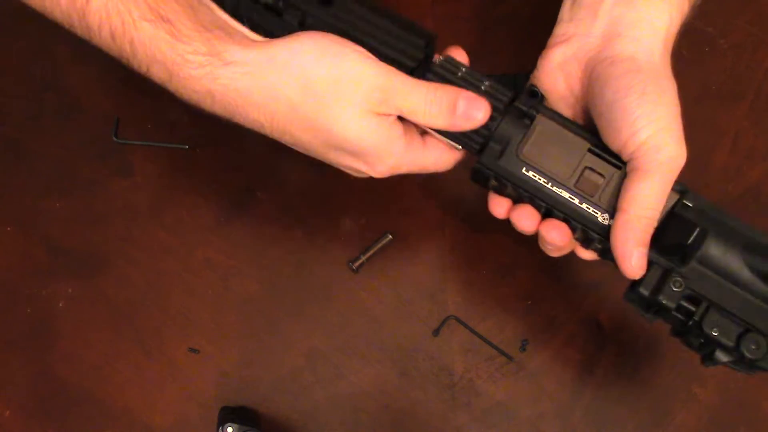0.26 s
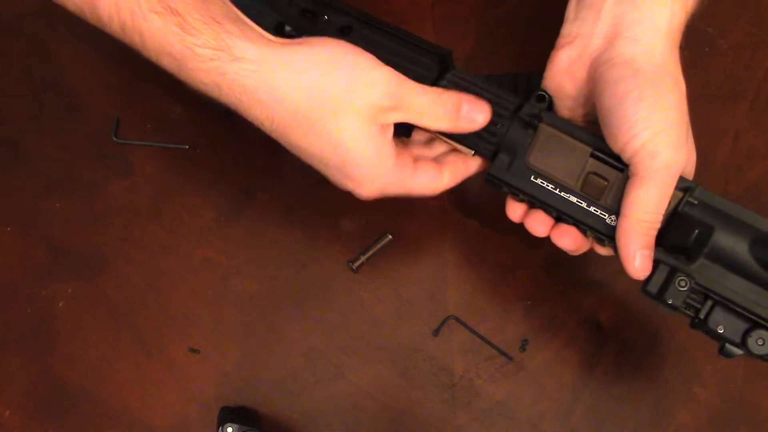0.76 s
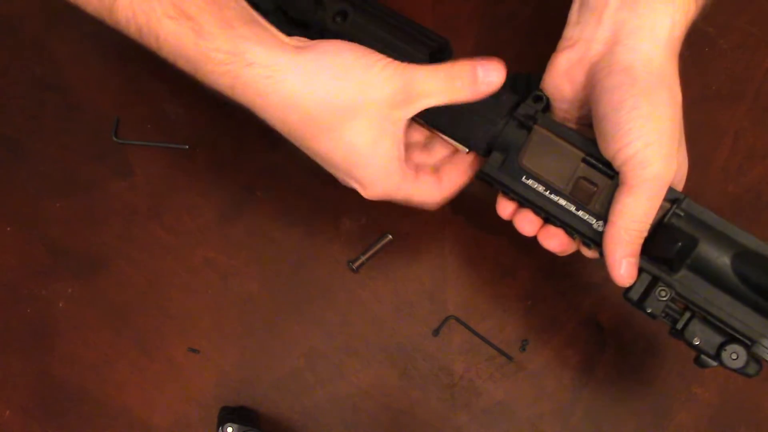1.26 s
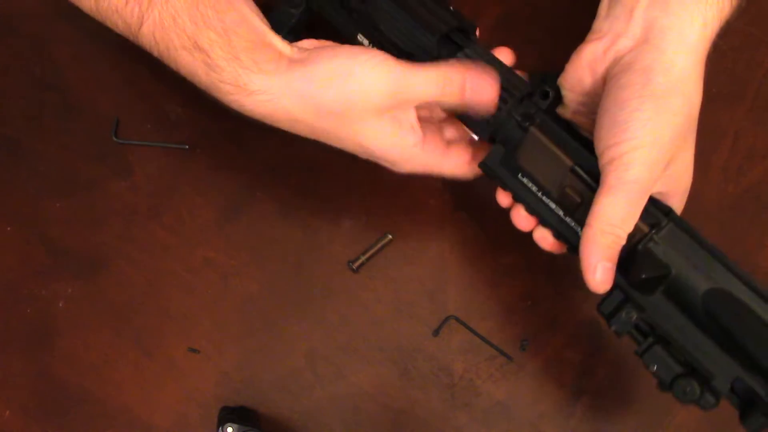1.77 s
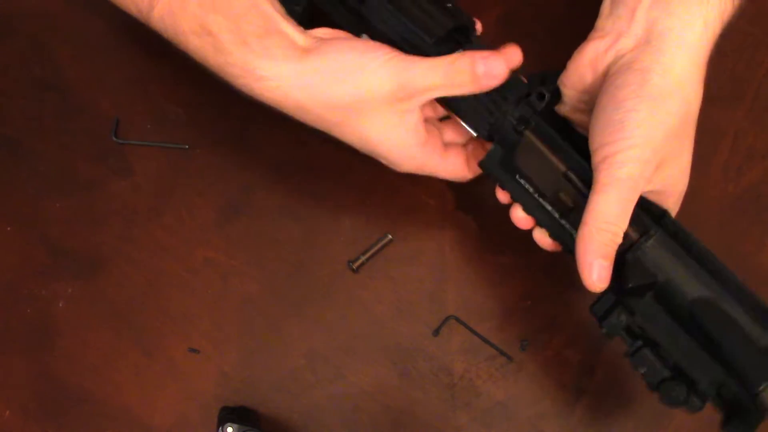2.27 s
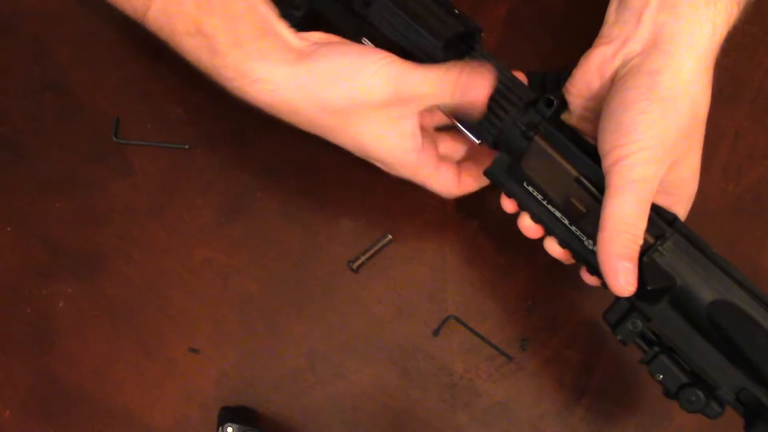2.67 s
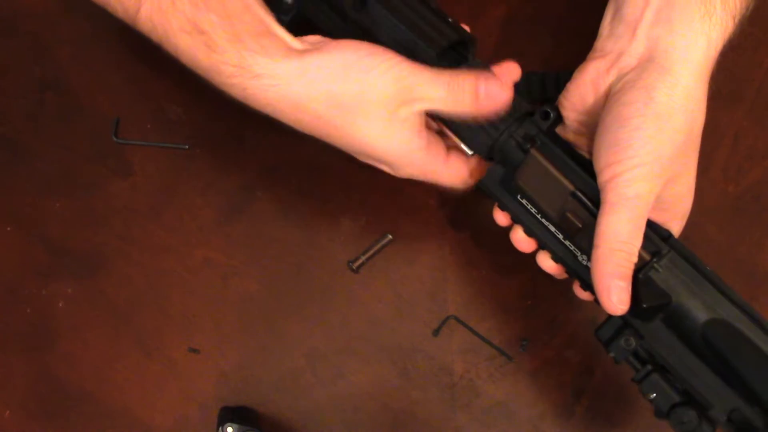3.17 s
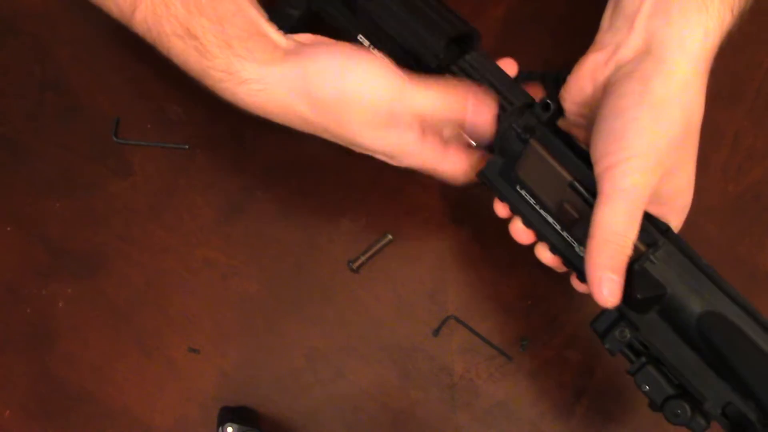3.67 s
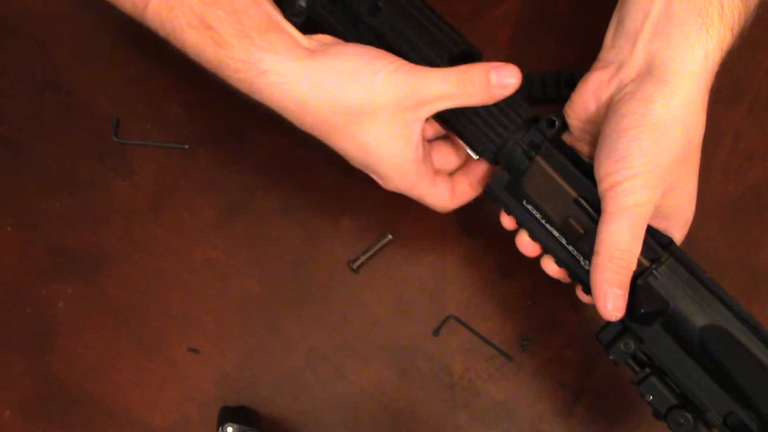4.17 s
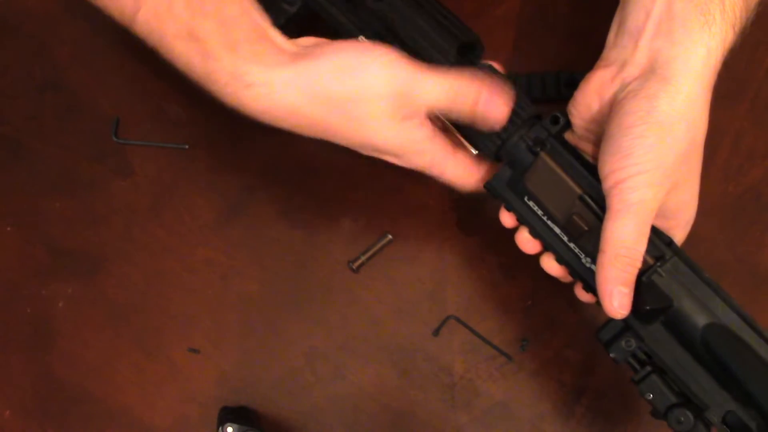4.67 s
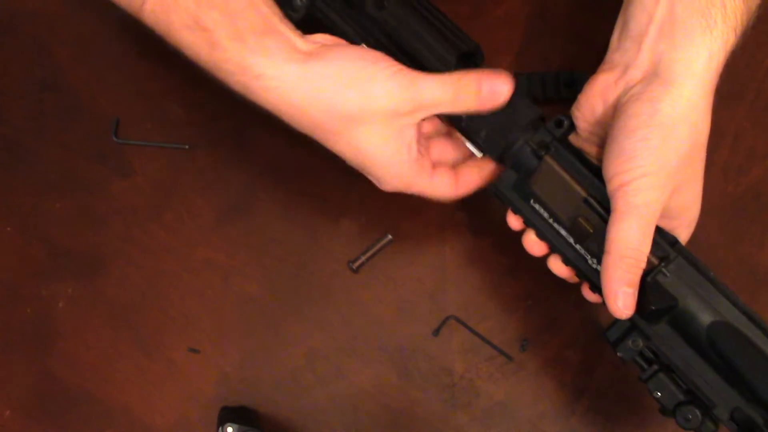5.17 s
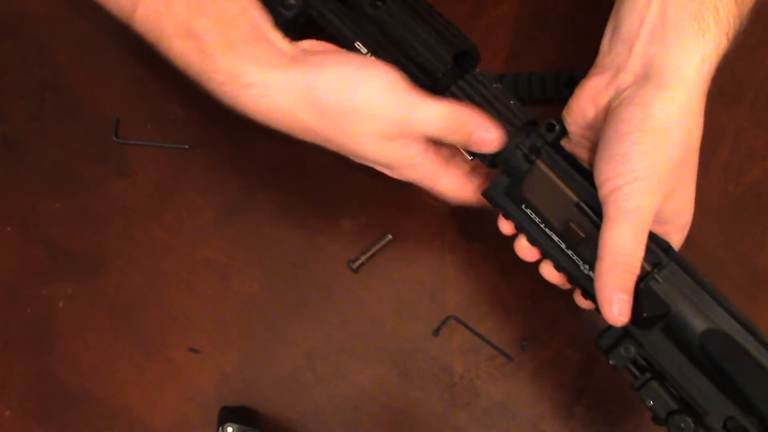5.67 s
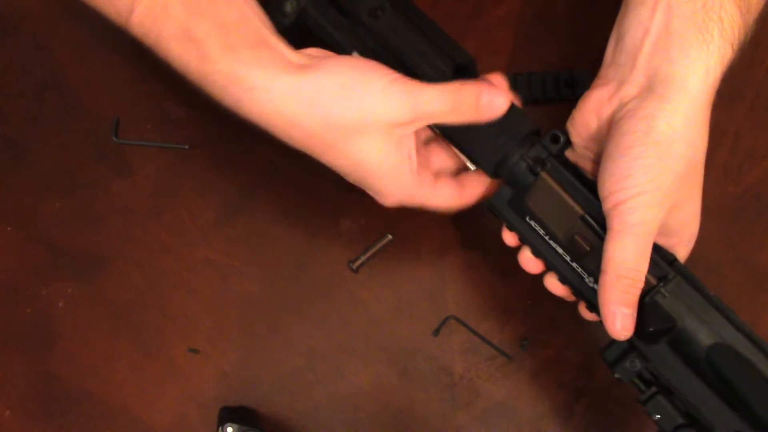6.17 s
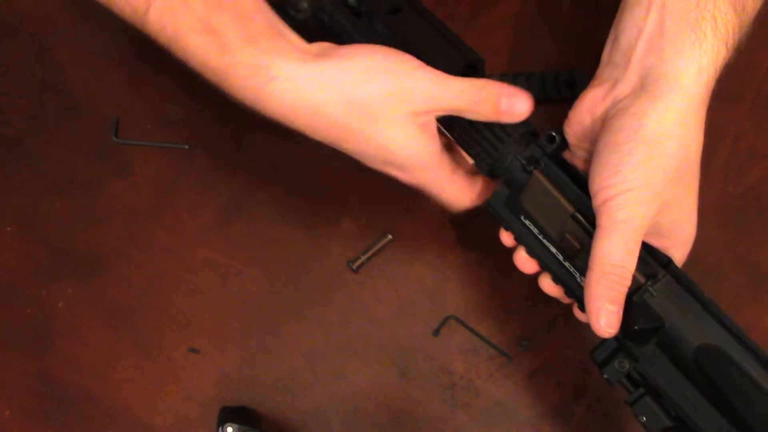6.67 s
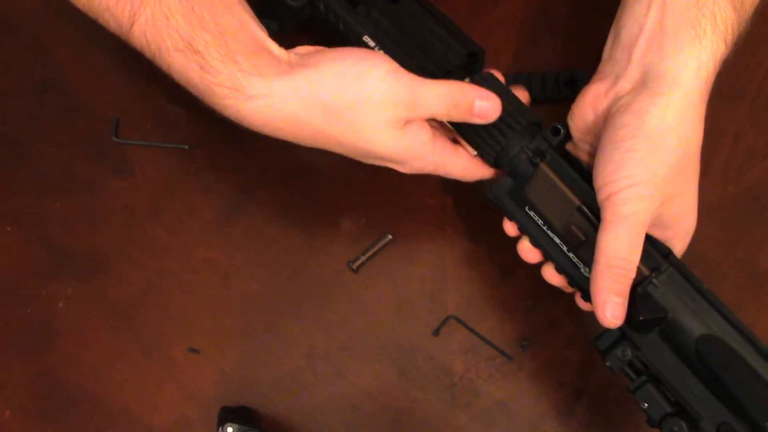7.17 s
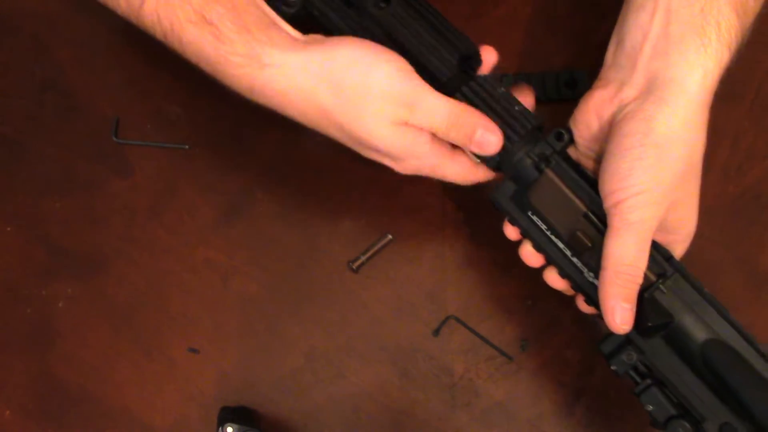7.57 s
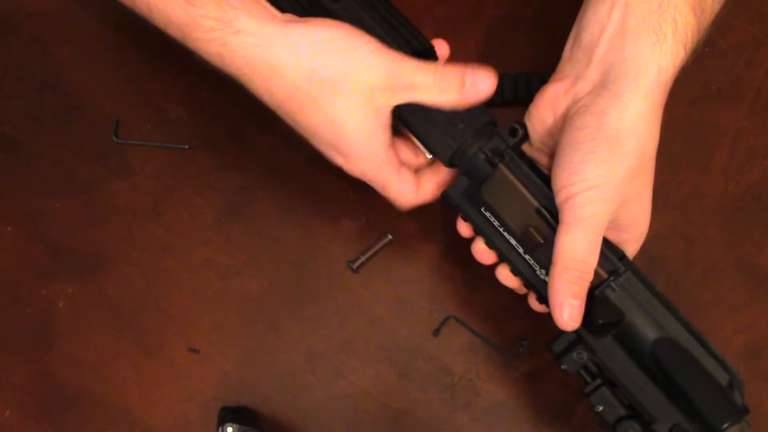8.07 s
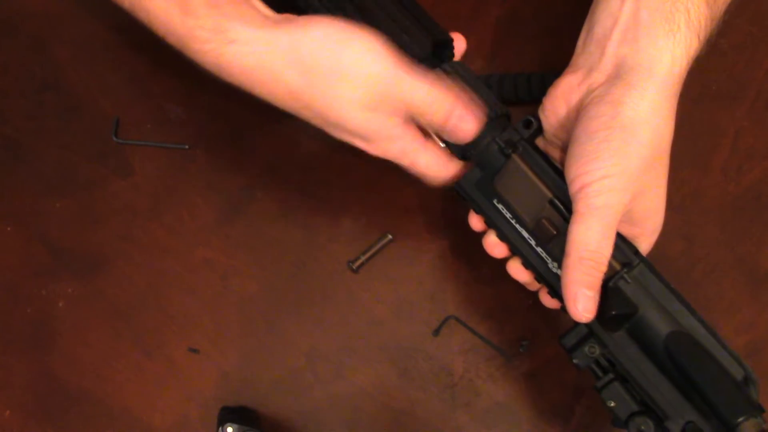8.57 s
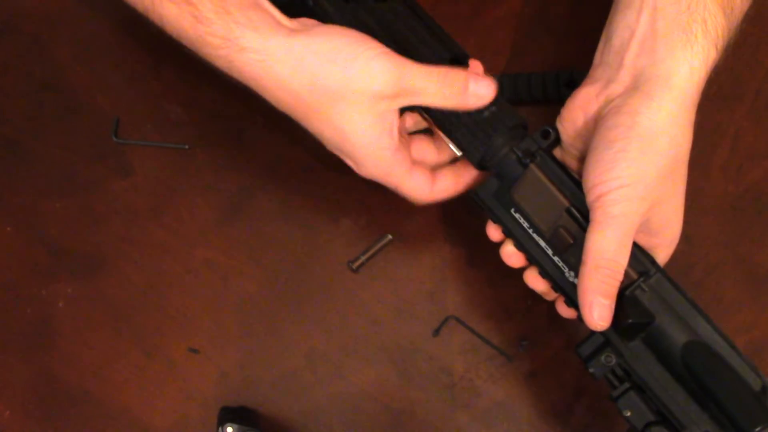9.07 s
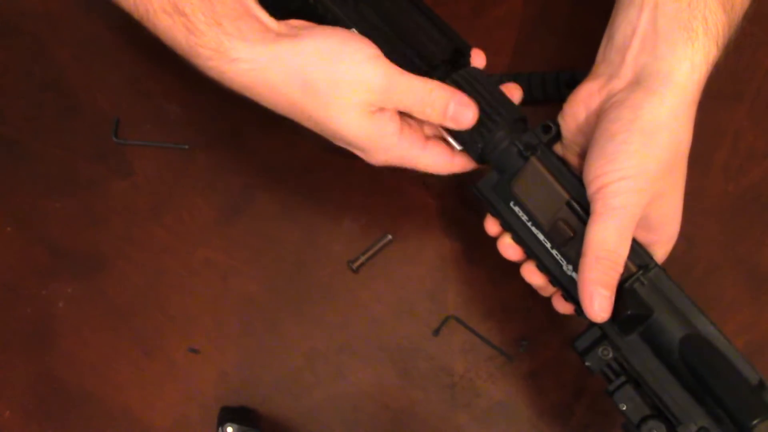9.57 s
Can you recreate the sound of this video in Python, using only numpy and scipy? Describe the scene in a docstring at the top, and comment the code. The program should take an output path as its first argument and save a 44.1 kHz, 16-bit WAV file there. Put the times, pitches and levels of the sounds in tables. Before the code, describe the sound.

Hands twist a metal handguard tube on an airsoft rifle, close up in a small room. Loud, sharp clicks and clacks with brief metallic ringing crowd the first three seconds, then quick ratchet-like runs grow much quieter, with soft gaps between. Near the end the clicks become firmer again. Fingers rub, and a faint mains hum and fan-like drone lie behind.

```python
"""A handguard tube is twisted off an airsoft rifle by hand, close up in a small room.
Each twist is a run of clicks: noise bursts for the snap and catch tick, decaying modes for receiver and tube.
Hard blows ring the tube longer; shaped noise makes the grating thread, rubbing fingers and brushing palm.
Behind them a mains hum of sine harmonics, a fan-like drone of resonant noise and the room's hush sink in the
middle and swell again."""
import sys
import numpy as np
from scipy import signal
from scipy.fft import rfft, irfft, next_fast_len
from scipy.io import wavfile
from scipy.ndimage import uniform_filter1d, minimum_filter1d

SR = 44100
rng = np.random.default_rng(int(sys.argv[2]) if len(sys.argv) > 2 else 0)


def to_wav(sig):
    """Store sig (one row per channel, or 1-D mono) as 16-bit WAV at the path in sys.argv[1].

    Samples outside -1..1 are clipped; the rate is SR.
    """
    pcm = np.clip(np.atleast_2d(sig), -1, 1) * 32767
    pcm = np.round(pcm).astype(np.int16)
    wavfile.write(sys.argv[1], SR, pcm.T)  # frames by channels


N = 432488

# Background: relative level over time: (time [s], level [dB])
BACKGROUND_SWELL = [(0, 13), (1, 11.5), (1.7, 11), (2.75, 5), (3.25, -1), (7.3, 0), (8.25, 6), (9.1, 7.5),
                    (9.81, 14)]
# Mains hum: (harmonic number [-], relative level [dB])
HUM_HARMONICS = [(1, -98), (2, -72), (3, -64.5), (4, -58), (5, -67.5), (6, -70), (7, -89.5), (10, -71.5),
                 (11, -69.5)]
# Fan-like drone: (centre [Hz], relative width [Hz], relative level [dB])
DRONE_RESONANCES = [(137.3, 9.4, -64.5), (197.3, 11, -57), (382, 16, -61.5), (680, 50, -82.5)]
# Colour of the room's hush: (frequency [Hz], gain [dB])
HUSH_COLOUR = [(20, -28), (60, -20.5), (100, -14), (170, 3.5), (300, -1), (450, 2.5), (700, -3),
               (1500, -16), (4000, -15.5), (16000, -34)]
# Colour of the rumble that differs between the microphones: (frequency [Hz], gain [dB])
RUMBLE_COLOUR = [(20, -5), (70, -1), (250, -3), (1000, -31.5), (16000, -59)]
# Decay of the room: (band centre [Hz], time to fall 60 dB [s])
ROOM_DECAY = [(300, 0.93), (800, 0.4), (2100, 0.43), (5500, 0.39), (10000, 0.24), (15000, 0.17)]
# Fingers sliding on the tube: (time [s], relative level [dB])
RUB_LEVEL = [(0, -38.5), (.68, -47), (.85, -32), (1.3, -40), (2.5, -56), (4.3, -61), (7.4, -65),
             (8.5, -54.5), (9.81, -49)]
# Colour of rubbing skin: (frequency [Hz], gain [dB])
SKIN_COLOUR = [(150, -20), (500, 2.5), (900, 11), (1350, -2), (1800, 3.5), (4000, -4), (9000, -18.5),
               (16000, -30.5)]
# The hand shifts its grip: (middle [s], length scale [s], relative level [dB])
GRIP_SHIFTS = [(4.044, 0.13, -62), (4.226, 0.065, -54.5), (5.943, 0.04, -59), (7.565, 0.083, -51),
               (7.658, 0.087, -44.5), (7.801, 0.11, -62.5), (8.223, 0.086, -58)]
# Colour of the palm's dull brush: (frequency [Hz], gain [dB])
BRUSH_COLOUR = [(80, -26), (250, 4), (420, -0.5), (900, 4), (1500, 0.5), (3000, -49), (16000, -48)]
# Dull receiver knocks as the hand takes hold or lets go: (time [s], relative level [dB])
DULL_KNOCKS = [(0.106, -30), (0.1822, -17), (0.308, -16), (.5666, -24.5), (.7377, -32.5), (0.7815, -27.5),
               (0.8172, -6.5), (1.0566, -19), (1.5253, -21.5), (1.2694, -10.5), (1.552, -11),
               (1.716, -24.5), (1.8922, -20), (2.134, -30.5), (2.4527, -34), (2.66, -23), (2.7483, -16.5),
               (3.083, -33.5), (3.315, -36), (3.562, -29), (3.7037, -23.5), (4.004, -33), (4.1271, -36.5),
               (4.365, -31), (4.485, -37), (4.5739, -30), (4.7182, -31.5), (5.0583, -22.5), (5.1436, -35.5),
               (5.3964, -22.5), (5.847, -29), (6.237, -33), (6.431, -36.5), (6.801, -41.5), (8.4046, -20.5),
               (8.955, -30.5), (9.2568, -19.5), (9.5571, -14.5), (9.7104, -18.5)]
# Resonances of the gripped receiver: (frequency [Hz], relative level [dB], time to fall 60 dB [s])
RECEIVER_MODES = [(736, -11, 0.055), (864, -11, 0.057), (992, -8.5, 0.063), (1124, -7.5, 0.032),
                  (1215, 5, 0.025), (1316, 4.5, 0.042), (1364, 4.5, 0.051), (1456, 0.5, 0.032)]
# Modes of the metal tube: (frequency [Hz], relative level [dB], time to fall 60 dB [s])
TUBE_MODES = [(705, -10, .2), (1135, -9, .2), (1368, -8, .17), (2283, -2.5, .21), (2835, -6, .15),
              (2892, -4, .18), (3483, -1, .2), (3967, -7, .18), (4274, -9, .16), (4716, -3, .15),
              (4746, 0, .2), (5285, -2.5, .2), (5720, -7, .17), (5946, -2, .2), (6530, -3, .24),
              (6903, -4, .2), (7310, -3, .2), (7467, -7, .14), (8193, -3, .2), (8366, -7, .16),
              (8743, -5, .22), (9320, -6, .18), (9700, -3, .13), (10400, -5, .14), (10850, -1.5, .17),
              (11220, -3, .16), (12350, -10, .18), (13300, -6, .1), (13920, -7, .12)]
# Blows that leave the tube ringing: (time [s], relative level [dB], favoured mode [Hz])
TUBE_BLOWS = [(.157, -23.5, 2880), (.278, -34.5, 4530), (.295, -13, 4820), (.348, -11.5, 7220),
              (.513, -24, 2875), (.85, -11, 9050), (.995, -23, 9200), (1.231, -14.5, 8190),
              (1.2705, -20, 7380), (1.745, -15, 3540), (1.838, -31.5, 9570), (1.91, -9, 9250),
              (1.93, -31.5, 2295), (2.21, -15, 2370), (2.25, -25.5, 11220), (2.545, -24.5, 4840),
              (2.86, -25.5, 3540), (3.155, -39, 2900), (4.582, -36.5, 5720), (9.395, -28, 9320),
              (9.722, -28.5, 5720)]
# Resonances of the catch: (centre [Hz], relative width [Hz], relative level [dB])
CATCH_RESONANCES = [(5925, 150, -9), (9900, 250, 2), (9570, 530, 11.5), (10690, 900, 2), (11400, 950, -5.5),
                    (13450, 640, 6.5), (12800, 210, -16.5)]
# Colour of a snap: (frequency [Hz], gain [dB])
SNAP_COLOUR = [(150, -36.5), (450, -13.5), (750, -6), (1700, -3.5), (2300, 3), (2550, 1.5), (2900, 4.5),
               (4200, 3), (4750, 2), (7400, 5), (8700, 0), (12000, -6), (14000, -7), (15000, -18.5),
               (16000, -33.5)]
# Twists, each a quick run of small clicks: (start [s], length [s], relative snap level [dB],
# hardness [dB/octave], resonance of the touched spot [Hz])
TWIST_RUNS = [(.388, .11, -20, 0.5, 4660), (0.846, 0.14, -20.5, -9, 2850), (1.919, 0.041, -17.5, 2, 2900),
              (2.217, 0.061, -15, 5, 2740), (2.842, .045, -18, 6, 4700), (3.434, .092, -24, 1.5, 6700),
              (4.109, .06, -50.5, -13, 2700), (4.712, 0.02, -39.5, -3, 4530),
              (4.8216, 0.11, -38, -7.5, 5850), (5.193, 0.055, -30.5, -2.5, 5680),
              (5.457, 0.064, -38.5, -4.5, 3540), (5.765, 0.1, -31.5, 1, 6000),
              (6.152, 0.099, -31, 0.5, 4700), (6.467, 0.11, -29.5, -1, 4860),
              (6.82, 0.084, -33.5, 0.5, 5940), (7.2147, 0.14, -32, 1.5, 4760),
              (8.016, 0.045, -27.5, -1, 6700), (8.373, .06, -29, -5, 4720), (8.67, .095, -30.5, -0.5, 3870),
              (9.036, .075, -31.5, -7.5, 4700), (9.3356, .06, -26.5, -6.5, 3980),
              (9.6147, 0.13, -22, -4, 5870)]
# Single clicks that stand out: (time [s], relative snap level [dB], hardness [dB/octave],
# resonance of the touched spot [Hz], catch tick relative to the snap [dB])
SINGLE_CLICKS = [(0.0642, -23.5, -10.5, 3500, -36), (0.111, -22, -14.5, 2800, -34),
                 (.138, -26.5, -14.5, 2320, -25), (0.1574, -11.5, -2.5, 3040, -8),
                 (.278, -22.5, -10.5, 3770, -24), (.2947, -3, 5, 4760, -16), (0.3072, -5, 3.5, 2980, -12),
                 (.3395, -17, -8, 3770, -8.5), (0.3481, -1.5, 0.5, 7080, 2),
                 (0.3763, -11.5, -9.5, 3640, -6), (0.4653, -13.5, 0, 2240, -20),
                 (0.5067, -14.5, -8, 6960, 0.5), (0.5129, -6.5, 0.5, 5300, -3.5),
                 (.799, -13.5, -9, 2320, -27), (0.8183, -8, 1, 3660, 6), (0.8322, -7, -4.5, 4680, 5),
                 (0.8813, -14.5, -6, 4900, 5.5), (0.9754, -15, -6, 7800, 9.5),
                 (0.9841, -6.5, -6.5, 2250, -11), (0.9944, -1.5, 3, 8480, -14),
                 (1.104, -16, -2.5, 6740, -0.5), (1.1305, -19, -8.5, 2830, -25),
                 (1.2235, -30.5, 7.5, 3410, -20), (1.2309, -5.5, -2, 7500, 8), (1.2702, -4.5, 4, 2200, 6),
                 (1.369, -20, -3, 6700, -1.5), (1.5428, -11, 0, 8000, 14), (1.5694, -9, 1.5, 2860, 7),
                 (1.6692, -26, -4.5, 7600, -3), (1.7379, -13, 11, 5600, -3), (1.7449, -8.5, -6.5, 3480, -9),
                 (1.8118, -10.5, -5.5, 3120, -15), (1.8374, -4, 4.5, 4700, -3.5),
                 (1.9094, -3, -3, 4740, -1), (1.9243, -6.5, 1.5, 7550, 9), (1.9655, -9, 2, 6400, 4),
                 (2.177, -32, -5.5, 4360, -22), (2.2085, -2, 1, 2820, -0.5), (2.2361, -6.5, -5, 2900, 6),
                 (2.2492, -6.5, 6, 4660, 0), (2.2864, -14.5, 1, 5700, 0), (2.3538, -19.5, 7, 3570, -3),
                 (2.4886, -31, -6, 2960, -10), (2.511, -26, 0, 4750, -17), (2.5262, -1, -3, 2900, 1),
                 (2.54, 0.5, 14, 4700, -8), (2.567, -9, -3, 4770, 3), (2.8204, -17, -3, 7900, 9),
                 (2.8266, -18, 4, 6800, 10), (2.8346, -12, -1.5, 4700, 8.5), (2.8447, -4.5, -3, 2770, 6),
                 (2.8524, -9, 13, 4700, -1), (2.865, -8.5, 9, 4830, 1), (2.882, -8, 8.5, 3900, -3),
                 (3.1342, -3.5, 3, 2880, 2), (3.1533, -6, 2, 6970, -4), (3.2661, -30.5, 3, 3010, -20),
                 (3.4101, -17.5, -5.5, 3700, 5), (3.4238, -14.5, 0.5, 3350, 3), (3.4612, -16, 2, 4700, -5),
                 (3.5138, -19.5, 0.5, 6300, -1.5), (3.729, -26.5, -6, 4860, -7),
                 (3.7994, -31, -5, 6980, -15), (3.808, -19, 0.5, 4730, -11), (3.8135, -18, 0, 6940, -1),
                 (4.0739, -35, -4.5, 3240, -15), (4.1072, -41, 4, 2930, -3), (4.1996, -40.5, -8, 3560, 0),
                 (4.422, -30, -3, 5180, -5), (4.5167, -42, -6, 3430, -3), (4.551, -25, -1, 7260, -15),
                 (4.581, -18.5, 1.5, 5750, -20), (4.7677, -34.5, -4, 3650, -20),
                 (4.848, -37.5, -1, 7680, 8), (4.9084, -28, 1.5, 8930, 1), (5.0927, -33, 0.5, 3680, -16),
                 (5.7207, -38, -5.5, 5040, -20), (6.064, -44.5, -4.5, 2840, -24.5),
                 (6.095, -41.5, -2, 5980, 8.5), (6.2145, -22.5, -2, 4230, -8), (6.382, -44, -5, 4530, -19),
                 (6.4954, -28, 0, 4930, -9), (6.5127, -22.5, -0.5, 4840, 2), (6.609, -26.5, -2, 4870, -9),
                 (6.9004, -32.5, -0.5, 4700, 4), (7.1784, -40.5, -6.5, 3770, -22.5),
                 (7.6583, -42.5, -0.5, 2790, 4), (7.8704, -30, 3, 3800, -1), (7.899, -30, -5, 4700, -1),
                 (7.961, -40, 2, 3990, 4), (7.9983, -23, -1, 6740, 2), (8.0178, -22, 3.5, 4500, -8),
                 (8.2162, -34.5, -5, 3800, -11), (8.247, -33, 0, 3800, 6.5), (8.3349, -24.5, 2, 5950, 6),
                 (8.342, -21, 2, 2800, -1), (8.3943, -21, -3, 4940, -10), (8.4192, -20.5, 1.5, 4540, -17),
                 (8.645, -33.5, -6.5, 3610, -19), (8.67, -30.5, -1, 5900, 14.5),
                 (8.7464, -27.5, -2, 3830, 7), (8.786, -23, -1.5, 5760, -3), (8.8276, -27, -8, 2940, -18),
                 (8.857, -16, 0.5, 3880, -11), (8.9215, -25.5, -5.5, 7440, -10), (8.9974, -30, 7, 3950, 0),
                 (9.006, -21, -2, 4800, -7), (9.023, -20, -2, 5160, 7.5), (9.046, -22.5, -2, 3830, 5),
                 (9.0611, -18.5, -1.5, 4620, -9), (9.1037, -22, -5.5, 3850, -7),
                 (9.1938, -36, -8.5, 3280, -13), (9.309, -29.5, -3, 3980, 12),
                 (9.3241, -17.5, -1, 4870, -1), (9.388, -20, -3, 4380, 1), (9.4343, -16.5, -2.5, 5800, -6),
                 (9.644, -12, 4, 4800, -2.5), (9.6598, -13.5, -3.5, 3740, 0.5), (9.675, -16, 1, 4700, -10),
                 (9.7217, -9, -1, 5770, -24)]

MAINS_HZ, TOP_HZ = 60, 15800
SIZE = 4096  # samples in one click
CLICK_S = .005  # reference length for click energy
SPOT_WIDTH_HZ = 240
TIME, AGE = np.arange(N) / SR, np.arange(SIZE) / SR
LONG = next_fast_len(N, True)
BINS = np.fft.rfftfreq(LONG, 1 / SR)

CLICKS_PER_TWIST = 7
# rms scatter within a twist: share of a step, dB, dB/octave, dB, octaves
SLIP_JITTER, SLIP_SPREAD_DB, HARDNESS_SPREAD, TICK_SPREAD_DB, SPOT_SPREAD_OCT = .3, 2.2, 2.8, 7.5, 0.014
TWIST_CATCH_DB, FIRST_CLICK_DB = -2, -1  # mean tick relative to the snap; level change of the first click
# turning peaks at this share of the twist; dB and dB/octave lost, by squared distance, a whole twist away
PEAK_SHARE, FADE_DB, FADE_HARDNESS = 0.32, 15, 7.7
# the hand cushions a knock: its snap relative to the knock [dB], dB/octave, Hz, tick [dB]
KNOCK_SNAP_DB, KNOCK_HARDNESS, KNOCK_SPOT_HZ, KNOCK_TICK_DB = -5.0, -8, 3470, -18
# receiver's answer to a middling click of zero hardness [dB], that click's level [dB],
# growth [dB per dB], change with hardness [dB per dB/octave]
BODY_DB, MIDDLING_DB, BODY_GROWTH, BODY_PER_HARDNESS = -8.5, -27.5, 0.74, -.6
# a strong click shakes the whole tube: above this snap level [dB] the spot stands out less [dB per dB]
SPOT_FULL_DB, SPOT_LOSS = -15, .25


def amp(db):
    """Decibels to gain."""
    return 10 ** (np.asarray(db) / 20)


def unit(x):
    """Scale to an rms of one."""
    return x / np.sqrt(np.mean(x ** 2))


def unit_click(x):
    """Give each row the energy of a signal of rms one lasting CLICK_S."""
    return x * np.sqrt(CLICK_S * SR / np.sum(x ** 2, axis=-1, keepdims=True))


def curve(rows):
    """Join (time, value) rows by straight lines."""
    return np.interp(TIME, *np.transpose(rows))


def colour(points, hz):
    """Gain of a (frequency, dB) spectrum at the given frequencies."""
    f, db = np.transpose(points)
    return amp(np.interp(np.log(hz + 1), np.log(f), db))


def resonance(hz, centre, width):
    """Complex response of one resonance."""
    return 1j * hz * width / (centre ** 2 - hz ** 2 + 1j * hz * width)


def causal(gain):
    """Minimum-phase responses with these gains, so the sound starts at the contact."""
    cepstrum = irfft(np.log(gain + 1e-6))
    fold = np.r_[1, np.full(SIZE // 2 - 1, 2), 1, np.zeros(SIZE // 2 - 1)]
    return np.exp(rfft(cepstrum * fold))


def filtered(x, gain):
    """Apply a gain given at the frequencies in BINS."""
    return irfft(rfft(x, LONG) * gain, LONG)[:N]


def noise(points):
    """Steady noise of a given colour, at an rms of one."""
    return unit(filtered(rng.standard_normal(N), colour(points, BINS)))


def add(track, s, sound):
    """Mix a sound into a track at time s."""
    i = max(int(s * SR), 0)
    track[i:i + len(sound)] += sound[:max(N - i, 0)]


def swell(middle, length):
    """A smooth rise and fall that reaches zero one length either side of the middle."""
    return np.maximum(1 - ((TIME - middle) / length) ** 2, 0) ** 2


def turning():
    """Strength of the turning: a smooth hump for each twist."""
    return sum(amp(db) * swell(s + length / 2, 0.77 * length) for s, length, db, _, _ in TWIST_RUNS)


def background(hush_db, drone_db, hum_db, side_db):
    """Mains harmonics, a drone of noise in narrow resonances, the room's hush and a low rumble."""
    hum, drone = np.zeros(N), np.zeros(N)
    for harmonic, db in HUM_HARMONICS:
        cycles = harmonic * MAINS_HZ * TIME + rng.random()
        hum += amp(db) * np.sqrt(2) * np.sin(2 * np.pi * cycles)
    for centre, width, db in DRONE_RESONANCES:
        response = resonance(BINS, centre, 1.31 * width) ** 2
        drone += amp(db) * unit(filtered(rng.standard_normal(N), response))
    mid = amp(hum_db) * hum + amp(drone_db) * drone + amp(hush_db) * noise(HUSH_COLOUR)
    side = amp(side_db) * noise(HUSH_COLOUR) + amp(-84) * noise(RUMBLE_COLOUR)
    return np.array([mid + side, mid - side]) * amp(curve(BACKGROUND_SWELL))


def room(x, wet_db, gap_s):
    """Wall reflections blur into a noise tail whose highest treble dies first."""
    age, hz = np.arange(SR // 2) / SR, np.fft.rfftfreq(SR // 2, 1 / SR)
    centres, t60 = np.transpose(ROOM_DECAY)
    white, tail = rfft(rng.standard_normal(len(age))), np.zeros(len(age))
    for band, decay in zip(np.eye(len(ROOM_DECAY)), t60):
        band_noise = irfft(white * np.interp(hz, centres, band), len(age))
        tail += band_noise * np.exp(-np.log(1000) * age / decay)
    tail *= np.clip(age / gap_s - 1, 0, 1)  # silent for one gap, faded in over the next
    return amp(wet_db) * signal.fftconvolve(x, tail / np.sqrt(np.sum(tail ** 2)))[:N]


def ports(x, side_db):
    """The two microphone ports hear the treble slightly out of step: a quarter-turned side signal."""
    return amp(side_db) * filtered(x, 1j * np.clip((BINS / 4500) ** 2, 0, 1))


def fingers(rub_db, twist_db, shift_db, uneven_db):
    """Skin rubs with a fluttering level as it sticks and slips, harder in twists and grip changes."""
    slips = unit(uniform_filter1d(rng.standard_normal(N), size=260))
    shifting = sum(amp(db + shift_db) * swell(s, length) for s, length, db in GRIP_SHIFTS)
    pressure = amp(curve(RUB_LEVEL) + rub_db) + amp(twist_db) * turning() + shifting
    return unit(noise(SKIN_COLOUR) * amp(uneven_db * slips)) * pressure


def grip(brush_db):
    """The palm brushes over the tube as it takes a new hold: dull noise in bell-shaped swells."""
    strokes = sum(amp(db) * np.exp(-(2 * (TIME - s) / length) ** 2) for s, length, db in GRIP_SHIFTS)
    return amp(brush_db) * strokes * noise(BRUSH_COLOUR)


def jolts(thump_db, thump_hz, fall_s):
    """Each single click jolts the rifle in the hands: a short low thump in proportion to the snap."""
    thump, out = np.sin(2 * np.pi * thump_hz * AGE) * np.exp(-AGE / fall_s), np.zeros(N)
    for s, db, _, _, _ in SINGLE_CLICKS:
        add(out, s, amp(db + thump_db) * thump)
    return out


def thread(grate_db, grain, catch_db):
    """During each twist the dry thread grates: dense tiny impacts in the colour of snap and catch."""
    unevenness = unit(uniform_filter1d(rng.standard_normal(N), size=24))
    impacts = rng.standard_normal(N) * np.exp(grain * unevenness)
    catch = sum(amp(db + catch_db) * np.abs(resonance(BINS, centre, width)) ** 2
                for centre, width, db in CATCH_RESONANCES)
    return amp(grate_db) * turning() * unit(filtered(impacts, colour(SNAP_COLOUR, BINS) + catch))


def struck(modes, age, scatter_db, detune, count):
    """Decaying modes of one object; each blow lands elsewhere and weights them anew."""
    hz, db, t60 = np.transpose(modes)
    chance = rng.standard_normal((count, 3, len(hz)))
    weight = amp(db + scatter_db * chance[:, 0]) * np.exp(2j * np.pi * chance[:, 1])
    waves = np.exp((2j * np.pi * hz - np.log(1000) / t60)[:, None] * age)
    shift_hz = detune * hz.mean() * chance[:, 2, :1]  # the grip shifts the pitch a little
    return ((weight @ waves) * np.exp(2j * np.pi * shift_hz * age)).imag * (1 - np.exp(-age / 0.0006))


def tube(ring_db, favour_db, split):
    """Hard blows leave the loose tube ringing; where a blow lands favours one mode."""
    out, age = np.zeros(N), np.arange(SR // 4) / SR
    hz, mode_db, t60 = np.transpose(TUBE_MODES)
    for s, db, strongest_hz in TUBE_BLOWS:
        favoured = favour_db * np.exp(-((hz - strongest_hz) / 120) ** 2)
        dulled = 5.3 * np.maximum(np.log2(hz / strongest_hz), 0)  # weaker above the favoured mode
        modes = np.column_stack([hz, mode_db + favoured - dulled, t60])
        # the tube is not quite round: its modes come in close pairs
        modes = np.vstack([modes, modes * [1 + split, 1, 1]])
        ring = struck(modes, age, scatter_db=2.2, detune=.0003, count=1)[0]
        add(out, s, amp(db + ring_db) * ring / ring[:SIZE // 4].std())
    return out


def twist(start, length, db, hardness, spot_hz):
    """The tube catches and slips in near-even steps, hardest where it turns fastest."""
    # uniform chance scaled to an rms of one
    early, size, edge, place, tick = np.sqrt(3) * rng.uniform(-1, 1, (CLICKS_PER_TWIST, 5)).T
    step = np.arange(CLICKS_PER_TWIST)
    share = (step + SLIP_JITTER * early * (step > 0)) / step[-1]
    slow = (share - PEAK_SHARE) ** 2
    return np.column_stack([
        start + length * share,
        db + FIRST_CLICK_DB * (step == 0) - FADE_DB * slow + SLIP_SPREAD_DB * size,
        hardness - FADE_HARDNESS * slow + HARDNESS_SPREAD * edge,
        spot_hz * 2 ** (SPOT_SPREAD_OCT * place),
        TWIST_CATCH_DB + TICK_SPREAD_DB * tick])


def contacts():
    """Single clicks, twist runs and dull knocks: (time, snap dB, hardness, spot Hz, tick dB, knock dB)."""
    sharp = np.vstack([SINGLE_CLICKS] + [twist(*row) for row in TWIST_RUNS])
    _, db, hardness, _, _ = sharp.T
    # the receiver answers relatively less when the click is loud or hard
    body_db = BODY_DB + (BODY_GROWTH - 1) * (db - MIDDLING_DB) + BODY_PER_HARDNESS * hardness
    dull = [(s, knock_db + KNOCK_SNAP_DB, KNOCK_HARDNESS, KNOCK_SPOT_HZ, KNOCK_TICK_DB, -KNOCK_SNAP_DB)
            for s, knock_db in DULL_KNOCKS]
    return np.vstack([np.column_stack([sharp, body_db]), dull])


def chatter(rise_s, fall_s, grain, count):
    """Spectra of contacts: each a burst of tiny impacts that dies in a few milliseconds."""
    age = AGE[:SIZE // 4]
    chance = rng.standard_normal((count, 2, len(age)))
    fall = fall_s * np.exp(.35 * chance[:, 1, :1])
    impacts = chance[:, 0] * np.exp(grain * chance[:, 1])  # a few impacts stand out
    return rfft(impacts * (1 - np.exp(-age / rise_s)) * np.exp(-age / fall), SIZE)


def clicks(snap_db, knock_db, tick_db, tube_db, spot_db):
    """Each contact snaps at the touched spot, knocks the receiver, ticks the catch and rings the tube."""
    s, level_db, hardness, spot_hz, tick, knock = contacts().T
    count, hz = len(s), np.fft.rfftfreq(SIZE, 1 / SR)

    # a cushioned contact loses the top and damps the metal
    softness = np.maximum(-hardness, 0)[:, None]
    tilt = amp(hardness[:, None] * np.log2(np.clip(hz, 2200, 8000) / 4500))
    tilt = tilt * amp(-softness * np.log2(np.maximum(hz / 8000, 1)))
    shaken_db = SPOT_LOSS * np.maximum(level_db[:, None] - SPOT_FULL_DB, 0)
    spot_gain = amp(spot_db - softness - shaken_db)
    spot = 1 + spot_gain * resonance(hz, spot_hz[:, None], SPOT_WIDTH_HZ)
    bursts = chatter(rise_s=0.00032, fall_s=0.0062, grain=0.39, count=count)
    snaps = irfft(bursts * causal(colour(SNAP_COLOUR, hz) * tilt) * spot)

    # the catch never lands twice the same way
    shares = amp(3.6 * rng.standard_normal((count, len(CATCH_RESONANCES))))
    catch = shares @ np.array([amp(db) * np.abs(resonance(hz, centre, 1.7 * width)) ** 2
                               for centre, width, db in CATCH_RESONANCES])
    ticks = irfft(chatter(rise_s=0.00036, fall_s=0.0028, grain=0.23, count=count) * causal(catch))

    knocks = struck(RECEIVER_MODES, AGE, scatter_db=3.5, detune=.04, count=count)
    rings = struck(TUBE_MODES, AGE, scatter_db=3, detune=.0006, count=count)
    rings = rings * (1 - AGE / AGE[-1])  # the hand stills them

    sounds = amp(snap_db) * unit_click(snaps)
    sounds += amp(tube_db - 1.3 * softness) * unit_click(rings)
    sounds += amp(knock_db + knock)[:, None] * unit_click(knocks)
    sounds += amp(tick_db + tick)[:, None] * unit_click(ticks)
    out = np.zeros(N)
    for when, db, sound in zip(s, level_db, sounds):
        add(out, when, amp(db) * sound)
    return out


def scene():
    """The rifle sits straight in front of the microphones, in a small room."""
    rifle = clicks(snap_db=-2.5, knock_db=-6, tick_db=-5.5, tube_db=-13.5, spot_db=12.5)
    rifle += tube(ring_db=-4.0, favour_db=12.5, split=0.0036)
    rifle += jolts(thump_db=-50.5, thump_hz=67.8, fall_s=0.005)
    rifle += fingers(rub_db=-2.5, twist_db=-20, shift_db=-16.5, uneven_db=4.5)
    rifle += thread(grate_db=-19, grain=.8, catch_db=-7.0)
    rifle += grip(brush_db=-4.5)
    mid = rifle + room(rifle, wet_db=-9.5, gap_s=0.0023)
    side = room(rifle, wet_db=-58.5, gap_s=.002) + ports(mid, side_db=-22.5)
    behind = background(hush_db=-60, drone_db=0.0, hum_db=-1.0, side_db=-72)
    return np.array([mid + side, mid - side]) + behind


def record(dry):
    """A fast limiter holds down the loudest peaks of both channels alike; a steep filter cuts the top."""
    allowed = np.minimum(1, .92 / (np.abs(dry).max(axis=0) + 1e-9))
    gain = uniform_filter1d(minimum_filter1d(allowed, size=61), size=61)
    return signal.sosfilt(signal.ellip(8, .2, 80, TOP_HZ, fs=SR, output="sos"), dry * gain)


dry = scene()
out = record(dry)
to_wav(out)
```